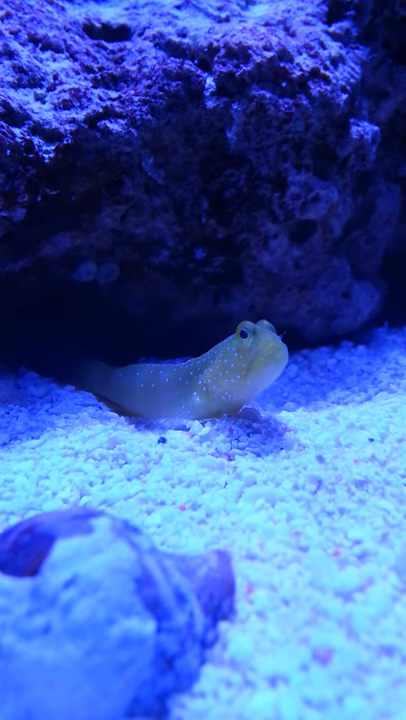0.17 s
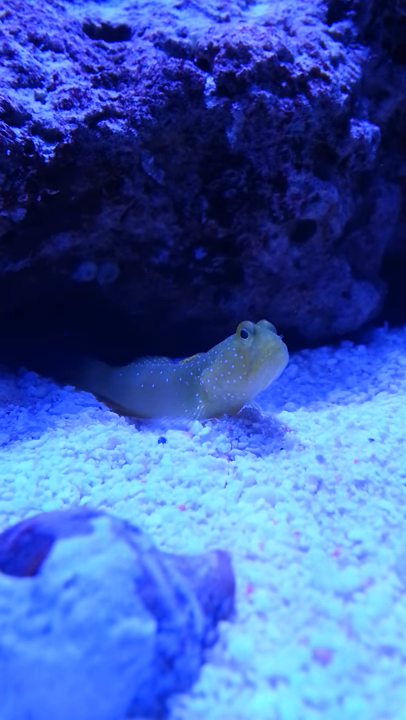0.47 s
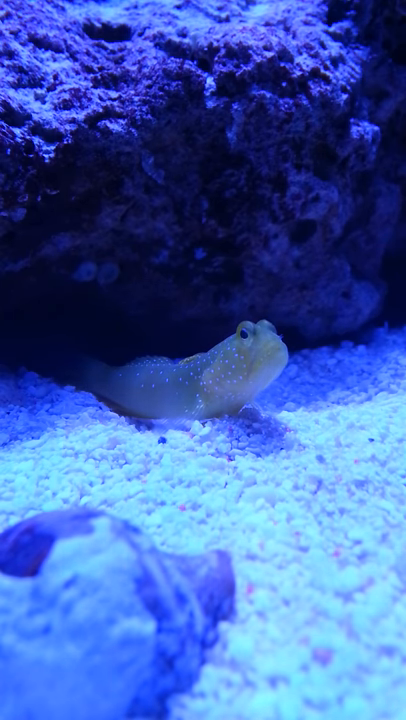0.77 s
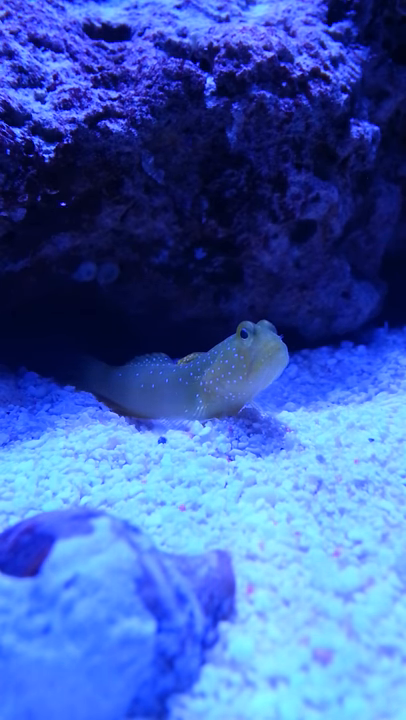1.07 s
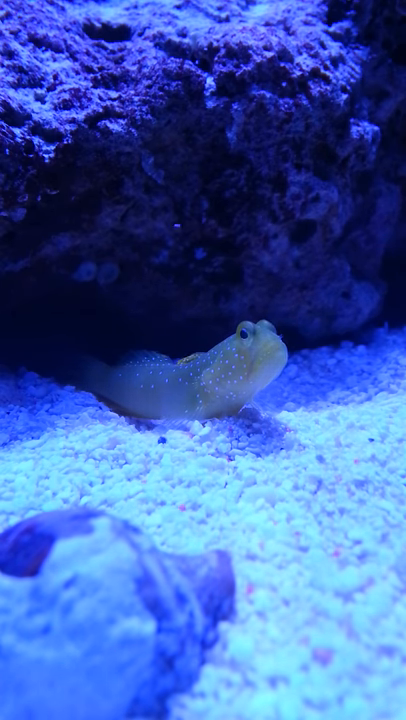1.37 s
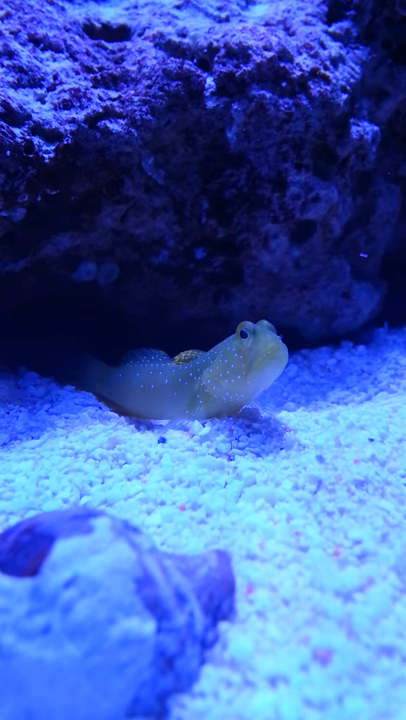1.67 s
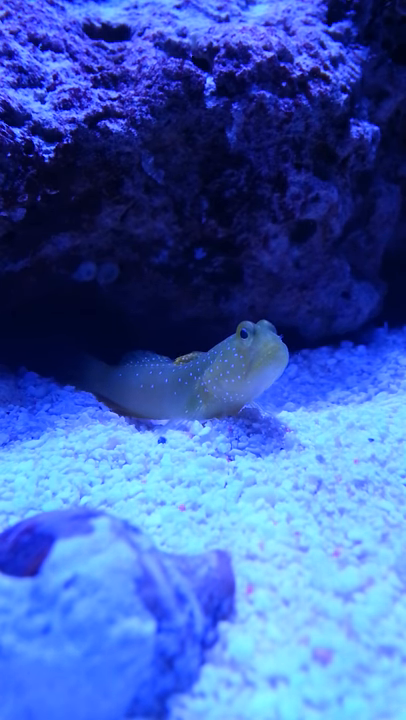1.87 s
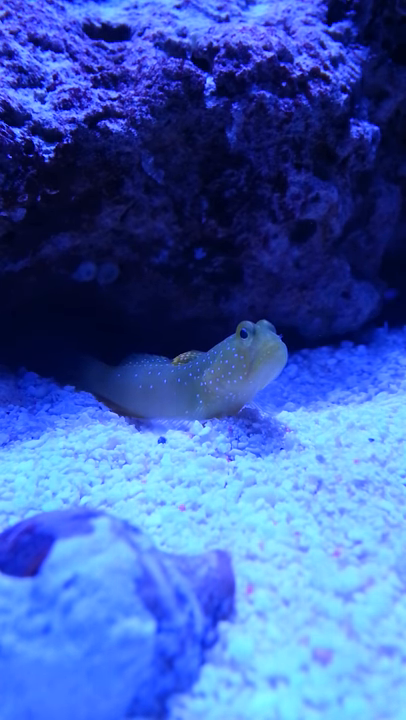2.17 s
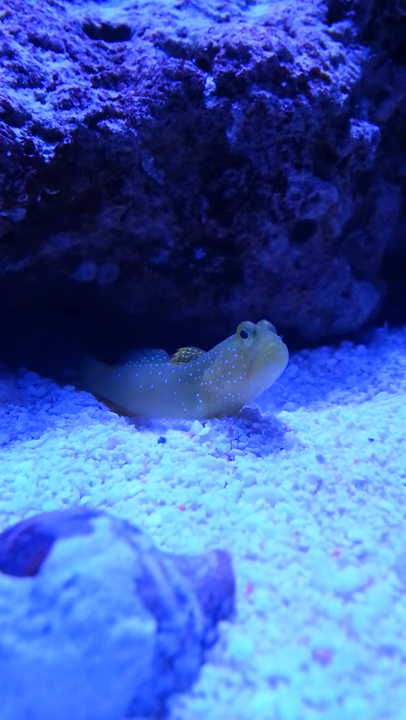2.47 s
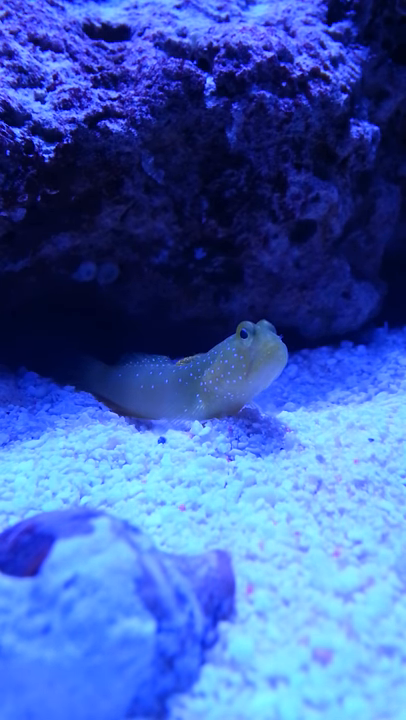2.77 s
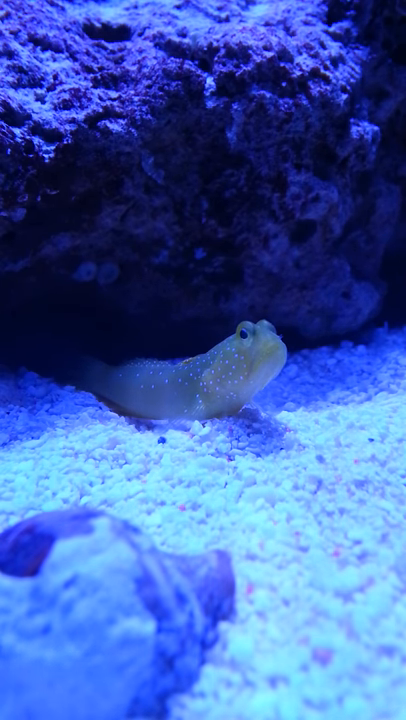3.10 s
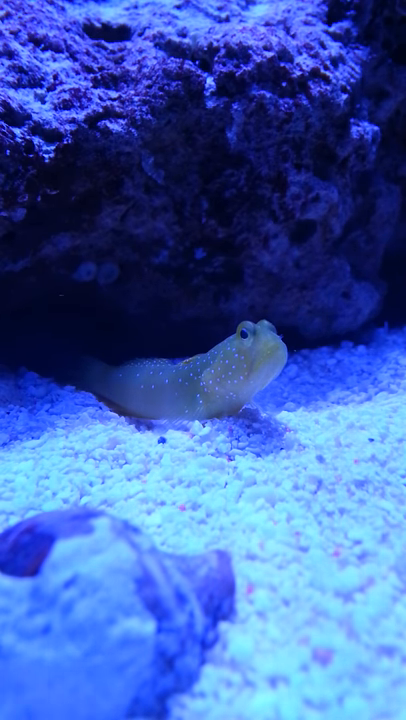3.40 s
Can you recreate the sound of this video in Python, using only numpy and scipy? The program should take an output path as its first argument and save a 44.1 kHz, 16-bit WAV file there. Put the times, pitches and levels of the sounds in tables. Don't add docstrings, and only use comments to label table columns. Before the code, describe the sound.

Aquarium pump hums low and steady while water trickles and bubbles lightly back into the tank

```python
import sys
import numpy as np
from scipy import signal
from scipy.fft import rfft, irfft, next_fast_len
from scipy.io import wavfile
from scipy.ndimage import uniform_filter1d, map_coordinates

SR = 44100
rng = np.random.default_rng(int(sys.argv[2]) if len(sys.argv) > 2 else 0)


def boost_factor(decibels):
    exponent = np.asarray(decibels, float) / 20
    return 10 ** exponent


def waveform_to_disk(signal):
    frames = np.transpose(np.atleast_2d(signal))
    scaled = np.clip(frames, -1, 1) * 32767
    samples = np.round(scaled).astype(np.int16)
    wavfile.write(sys.argv[1], SR, samples)


N = 156114

# (multiple of mains [count], left level [dB rms], right level [dB rms])
HUM = [(1, -81, -73), (2, -35.4, -39), (3, -44.2, -44.6), (4, -51.2, -53.8), (5, -62.5, -61),
       (6, -53.5, -60), (7, -62.3, -66.3), (8, -71, -76), (10, -71, -64.5), (15, -72, -67.5),
       (17, -75, -76), (19, -79, -80), (21, -79, -74)]
MAINS_HZ, MAINS_START_S = 59.995, .00725
HUM_SWAY_DB = 0.41
HUM_TWIST, HUM_TURN = 1.33, 2.24
LEFT_LEAD_S = 0.00036

# (pitch [Hz], level [dB rms])
WHINE = [(8000, -78), (10000, -77.5), (12000, -82), (13000, -85), (14000, -72)]

# (pitch [Hz], width [Hz], left level over the drone [dB], right level [dB])
CABINET = [(164.4, 20, 11.5, 8.5), (353, 35, 13.5, 11), (453, 19, 7, -14), (524.7, 6.8, 17, 19.5),
           (573, 8, 10.5, 11), (641, 17.5, 12, 7.5), (660, 20, 5.5, 6), (705, 18, 11.5, 9),
           (763, 13, -0.5, 7.5), (785, 22, 3, 6), (839.5, 10.6, 9, 5), (870, 13, 13, 13), (1009, 113, 8, 8),
           (1326, 112, 9, 10.5)]
# (frequency [Hz], level [dB])
DRONE_COLOUR = [(20, -27), (45, -10), (80, -3.5), (105, 1.5), (140, 6.5), (260, -2), (480, -5.5),
                (780, 1.5), (950, -12.5)]
# (frequency [Hz], left over right [dB])
DRONE_LEFT = [(30, -8), (100, 4), (400, 0), (1200, 5.5)]
# (frequency [Hz], likeness [0 to 1])
ALIKE = [(30, .1), (70, 0.6), (200, 0.81), (330, 0.29), (600, 0.51), (1200, 0.43), (2300, 0.029),
         (14000, 0.0054)]
DRONE_DB, DRONE_PATCH_DB = -42, 2

# (time [s], level [dB])
FLOW = [(0.0, -38.5), (0.05, -51), (0.15, -55), (0.19, -49), (0.29, -49.5), (0.54, -48), (0.59, -49),
        (0.79, -51.5), (0.97, -53), (1.17, -48), (1.18, -51), (1.22, -53.5), (2.35, -47.5), (2.37, -43),
        (2.43, -48), (3.01, -54), (3.06, -47.5), (3.54, -53)]
# (frequency [Hz], level [dB])
WATER_COLOUR = [(600, -33), (1180, -14.5), (1350, -11), (1530, -10.5), (1950, -2.5), (2600, -8), (4000, -3),
                (6900, -5), (8800, -8.5), (11000, -7)]
FLOW_DB, WATER_DB = 1, -5
SURGE_DB, FLUTTER_DB = 2, 1
BUBBLES, BUBBLE_HZ, BUBBLE_SPREAD = 11000, 5060, 0.68
SIZE_DB, BIGGEST_DB = 4, 16.5
CYCLES, RISE = 3.26, 0.57
DRIFT_M = .06
HISS_DB, HISS_SWAY_DB = -3, -1
SPRAY_DB = 8

# (time [s], peak level [dB], pitch [Hz], length [s])
SPLASHES = [(0.038, -22.5, 5800, 0.027), (0.076, -37, 5930, 0.019), (0.181, -28, 5600, 0.028),
            (0.232, -33, 5060, 0.02), (0.435, -26, 5300, 0.018), (0.479, -26.5, 6100, 0.028),
            (0.521, -26.5, 4700, 0.02), (0.545, -30, 6000, 0.021), (0.593, -29, 7300, 0.032),
            (0.7456, -26, 5250, 0.03), (0.758, -26, 6160, 0.028), (0.818, -24.5, 5660, 0.027),
            (0.883, -29, 5540, 0.013), (0.973, -28.5, 5090, 0.023), (1.029, -27, 5230, 0.029),
            (1.1787, -41, 5230, 0.028), (1.3533, -36, 5650, 0.019), (1.469, -29.5, 4940, 0.022),
            (1.5399, -45, 5810, 0.044), (1.695, -29, 5150, 0.025), (1.875, -30, 4200, 0.021),
            (1.959, -23, 7300, 0.026), (2.126, -28, 6340, 0.029), (2.17, -29, 7800, 0.03),
            (2.251, -28.5, 5570, 0.021), (2.372, -31, 5400, 0.02), (2.471, -30, 5040, 0.021),
            (2.63, -27.5, 5300, 0.026), (2.705, -31, 5200, 0.018), (2.832, -30, 5600, 0.02),
            (2.938, -31, 6940, 0.033), (3.035, -27, 5130, 0.021), (3.104, -27.5, 4730, 0.027),
            (3.211, -28, 5300, 0.021), (3.29, -31, 5060, 0.024), (3.388, -25.5, 5500, 0.025),
            (3.462, -36, 5100, 0.02)]
SPLASH_DB, SPLASH_SPREAD, SPLASH_CORE = -8, 0.384, 0.14
# (time [s], level [dB], pitch [Hz], life [cycles])
DRIPS = [(.688, -31, 6900, 22), (.701, -30, 6950, 22), (.239, -35, 3200, 9), (.885, -33, 9300, 14),
         (2.897, -36, 1850, 5), (3.172, -31, 2700, 5), (3.274, -29, 3250, 9), (2.944, -29, 6500, 3),
         (2.364, -23, 4900, 7), (3.106, -26, 4600, 5), (.437, -27, 5000, 5), (.52, -28, 3700, 5),
         (1.178, -23.5, 5200, 5), (1.352, -23, 5600, 8), (.818, -27, 5300, 6), (3.301, -24, 4300, 4),
         (3.033, -29, 4700, 4), (3.384, -25, 4800, 4), (1.539, -29, 5200, 4), (.071, -28, 5600, 6)]
DRIP_DB, DRIP_S = -2.2, .008

# (frequency [Hz], time to fade by 60 dB [s])
ROOM_FADE = [(500, 0.27), (4000, 0.072), (12000, 0.19)]
ROOM_DB = 5

# (pitch [Hz], width [Hz], level [dB])
PORTS = [(5500, 1290, 7.5), (7300, 1110, 9)]
PORT_TRIM_DB = [0, -1]
# (frequency [Hz], left over right [dB])
TREBLE_LEFT = [(700, -0.44), (1300, -1), (2000, 5), (2600, -2.5), (4000, 0.5), (6600, 0.5), (8000, -6),
               (11000, -5.5), (14000, -9)]
# (frequency [Hz], level [dB])
TOP_FALL = [(8000, -1), (9200, -3.5), (12000, -8.5), (14500, -16)]
TOP_HZ = 14550
HALF_EACH = np.array([[.5], [-.5]])


def unit(x):
    return x / np.sqrt(np.mean(x ** 2) + 1e-20)


def along(points, hz):
    f, v = np.transpose(points)
    return np.interp(np.log(hz + 1), np.log(f + 1), v)


def wobble(rate):
    knots = rng.standard_normal(int(N * rate / SR) + 4)
    return map_coordinates(knots, [np.arange(N) * rate / SR])


def filtered(x, response):
    m = next_fast_len(N + SR // 2)
    return irfft(rfft(x, m) * response(np.fft.rfftfreq(m, 1 / SR)), m)[..., :N]


def peak(f, hz, width):
    return 1j * f * width / (hz * hz - f * f + 1j * f * width)


def hum():
    t = np.arange(N) / SR + MAINS_START_S + np.array([[LEFT_LEAD_S], [0]])
    total = np.zeros((2, N))
    for multiple, left, right in HUM:
        k = round(multiple)
        sway = boost_factor(HUM_SWAY_DB * np.sqrt(multiple) * wobble(5.85))
        tone = np.cos(2 * np.pi * k * MAINS_HZ * t + HUM_TWIST * k ** 2 + HUM_TURN)
        total += np.sqrt(2) * boost_factor([[left], [right]]) * sway * tone
    return total


def whine():
    t = np.arange(N) / SR
    tones = np.zeros(N)
    for hz, db in WHINE:
        tones += np.sqrt(2) * boost_factor(db) * np.sin(2 * np.pi * hz * t + 0.4 * wobble(8.5))
    return tones * boost_factor([[-22], [0]])


def patches():
    z = signal.stft(rng.standard_normal((3, N)), nperseg=2048)[2]
    field = uniform_filter1d(rng.standard_normal(z.shape[1:]), size=4, axis=0)
    field = uniform_filter1d(field, size=6, axis=1)
    return signal.istft(z * boost_factor(DRONE_PATCH_DB * unit(field)), nperseg=2048)[1][:, :N]


def drone():
    def body(f):
        power = 1
        for hz, width, left, right in CABINET:
            power = power + abs(boost_factor([[left], [right]]) * peak(f, hz, width)) ** 2
        return boost_factor(along(DRONE_COLOUR, f)) * np.sqrt(power)

    def share(f):
        return np.clip(along(ALIKE, f), 0, 1)

    def lead(f):
        return np.exp(1j * np.pi * f * LEFT_LEAD_S * np.array([[1], [-1]]))

    noise = patches()
    common = filtered(noise[0], lambda f: body(f) * np.sqrt(share(f)) * lead(f))
    own = filtered(noise[1:], lambda f: body(f) * np.sqrt(1 - share(f)))
    balanced = filtered(common + own, lambda f: boost_factor(along(DRONE_LEFT, f) * HALF_EACH))
    return boost_factor(DRONE_DB) * unit(balanced)


def bubbles(s, hz, size, cycles):
    k = np.arange(256)
    turns = hz[:, None] * k / SR
    rising = np.sin(2 * np.pi * turns * (1 + RISE * turns / cycles ** 2))
    tone = rising * np.exp(-3 * turns / cycles)
    where = (s[:, None] * SR).astype(int) + k
    return np.bincount(where.ravel(), (size[:, None] * tone).ravel(), N + SR)[:N]


def at_ports(s, hz, size, cycles):
    lag = DRIFT_M / 343 * rng.standard_normal(len(s))
    left = bubbles(s + .002 - lag, hz, size, cycles)
    right = bubbles(s + .002 + lag, hz, size, cycles)
    return np.array([left, right])


def bubble_cloud(flow_db):
    hz = np.clip(BUBBLE_HZ * np.exp(BUBBLE_SPREAD * rng.standard_normal(BUBBLES)), 900, 14000)
    size_db = np.minimum(SIZE_DB * rng.exponential(size=BUBBLES), BIGGEST_DB)
    cloud = unit(at_ports(rng.random(BUBBLES) * N / SR, hz, boost_factor(size_db), CYCLES))
    return boost_factor(flow_db + SURGE_DB * wobble(7.6) + FLUTTER_DB * wobble(20)) * cloud


def spray_hiss(flow_db, near):
    swell = np.sqrt(abs(uniform_filter1d(near ** 2, size=1300)) / np.mean(near ** 2))
    spray_db = SPRAY_DB * (np.minimum(swell, 1.5) - 0.5)
    half_flow_db = (flow_db + flow_db.mean()) / 2
    level_db = spray_db + half_flow_db + HISS_DB + HISS_SWAY_DB * wobble(9.3)
    return boost_factor(level_db) * rng.standard_normal((2, N))


def room(x):
    out, step = np.zeros((2, N + SR)), SR // 3
    for a in range(0, N, step):
        hz, t, z = signal.stft(rng.standard_normal((2, step)), SR, nperseg=256)
        fade = boost_factor(-60 * t / along(ROOM_FADE, hz)[:, None])
        tail = signal.istft(z * fade, SR, nperseg=256)[1]
        y = signal.fftconvolve(x[None, a:a + step], tail / np.linalg.norm(tail[0]), axes=1)
        out[:, a:a + y.shape[1]] += y
    return out[:, :N]


def splashes():
    shape = (len(SPLASHES), 48)
    late, tune = rng.exponential(size=shape), rng.standard_normal(shape)
    s, db, hz, length = np.transpose(SPLASHES)[..., None]
    core = np.arange(48) < 6
    when = s - .004 + np.clip(length, .004, .08) * late * np.where(core, .2, 1)
    spread = np.where(core, SPLASH_CORE, SPLASH_SPREAD)
    pitch = np.clip(hz * np.exp(spread * tune), 900, 14000)
    size = boost_factor(db + SPLASH_DB + np.where(core, 5.5, 0))
    return at_ports(when.ravel(), pitch.ravel(), size.ravel(), CYCLES)


def drips():
    s, db, hz, cycles = np.transpose(DRIPS)[..., None]
    shape = (len(DRIPS), 3)
    late, tune = rng.random(shape), rng.standard_normal(shape)
    when = s - .002 + DRIP_S * late ** 2
    pitch = hz * (1 + 0.18 * tune / cycles)
    size = boost_factor(db + DRIP_DB) * np.ones(shape)
    life = cycles * np.ones(shape)
    return at_ports(when.ravel(), pitch.ravel(), size.ravel(), life.reshape(-1, 1))


def water():
    flow_db = FLOW_DB + np.interp(np.arange(N) / SR, *np.transpose(FLOW))
    near = bubble_cloud(flow_db) + splashes() + drips()
    hiss = spray_hiss(flow_db, near[0])
    everything = near + boost_factor(ROOM_DB) * room(near[0]) + hiss
    return boost_factor(WATER_DB) * filtered(everything, lambda f: boost_factor(along(WATER_COLOUR, f)))


def scene():
    return hum() + drone() + water()


def roll_off(x):
    return signal.sosfilt(signal.butter(12, 14650, fs=SR, output="sos"), x)


def record(dry):
    def ports(f):
        gains = []
        for (hz, width, db), trim in zip(PORTS, PORT_TRIM_DB):
            gains.append(1 + (boost_factor(db) * boost_factor(trim) - 1) * peak(f, hz, width))
        return np.array(gains)

    def tilt(f):
        return boost_factor(along(TOP_FALL, f) + along(TREBLE_LEFT, f) * HALF_EACH)

    heard = filtered(dry, lambda f: ports(f) * tilt(f))
    mix = filtered(heard + whine(), lambda f: f < TOP_HZ)
    return roll_off(mix)


dry = scene()
out = record(dry)
waveform_to_disk(out)
```